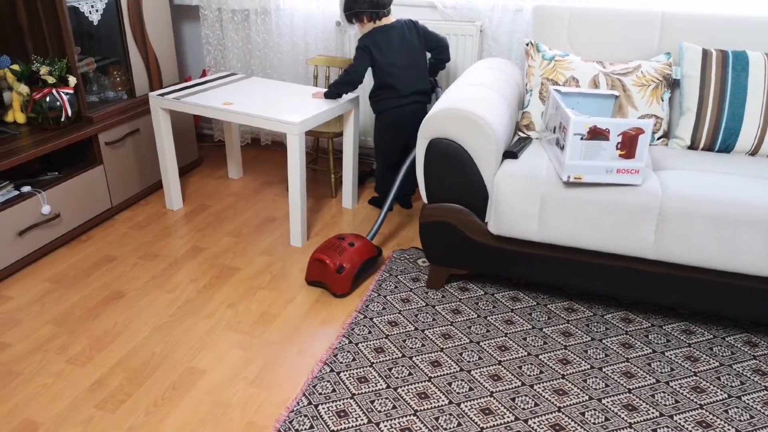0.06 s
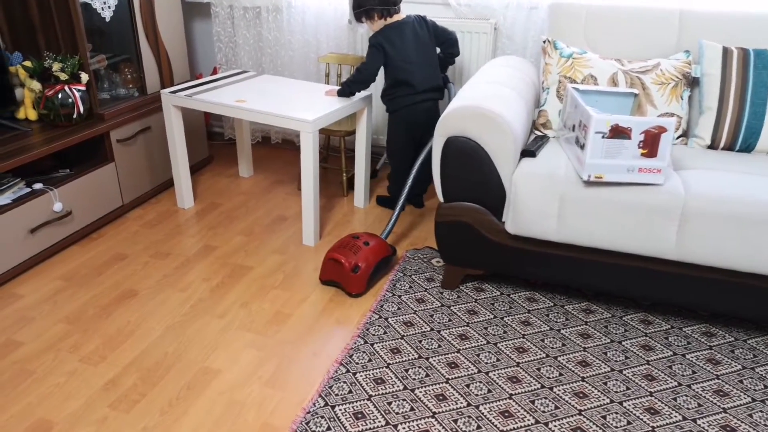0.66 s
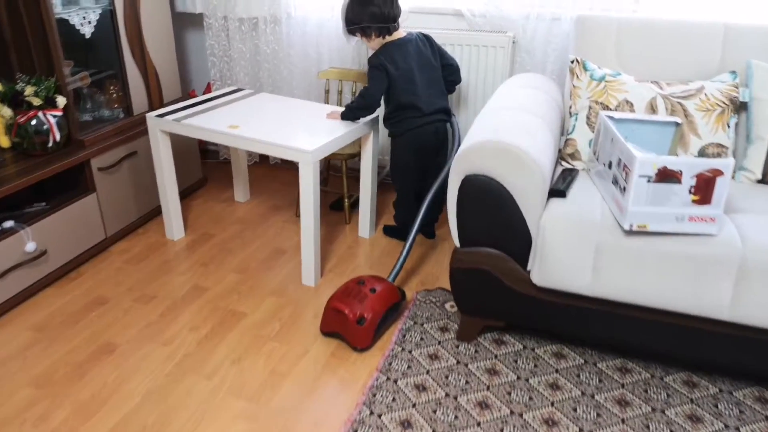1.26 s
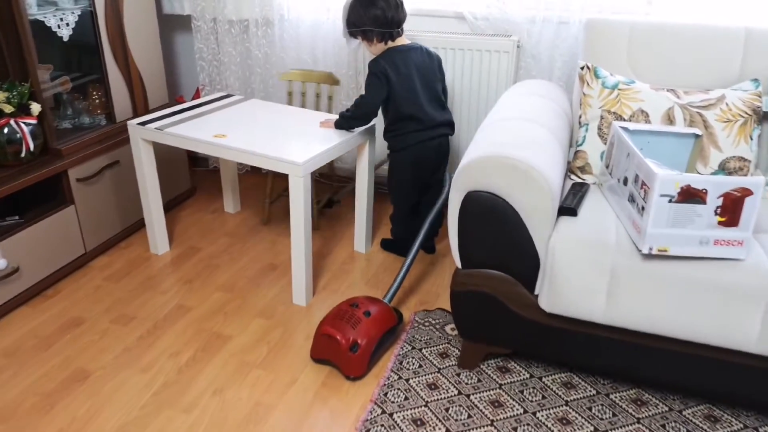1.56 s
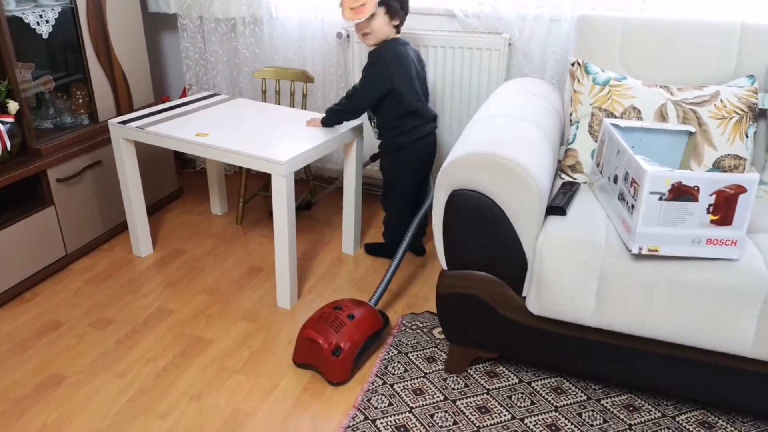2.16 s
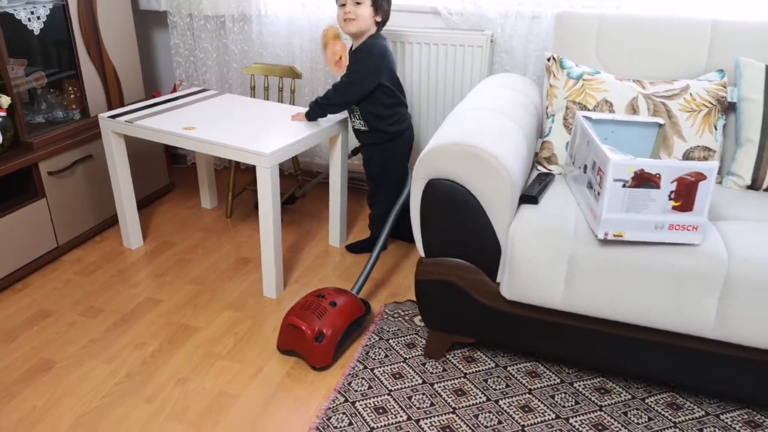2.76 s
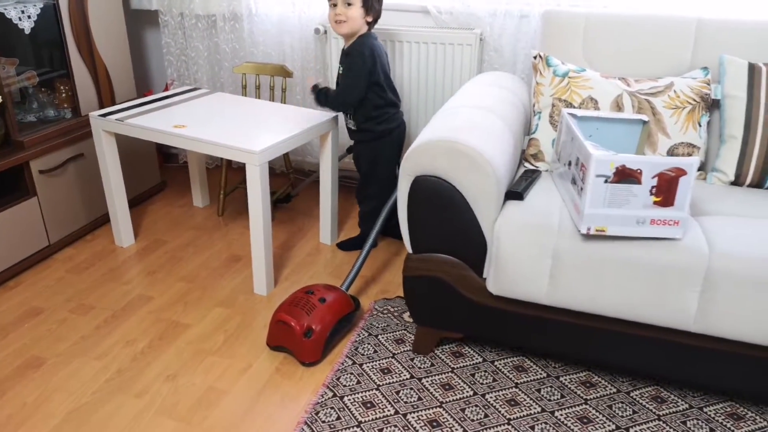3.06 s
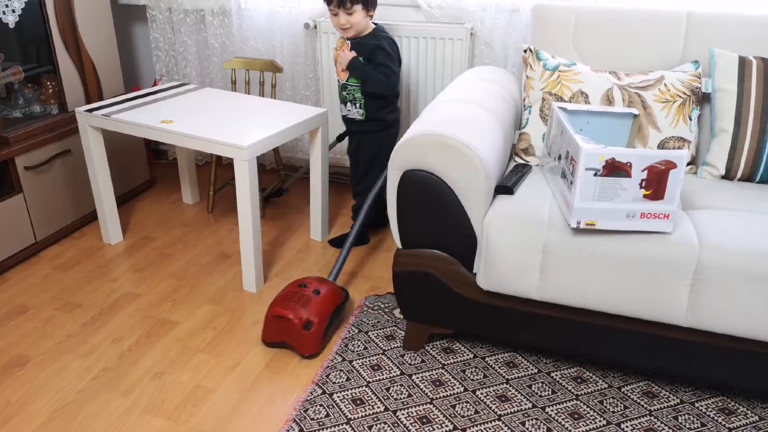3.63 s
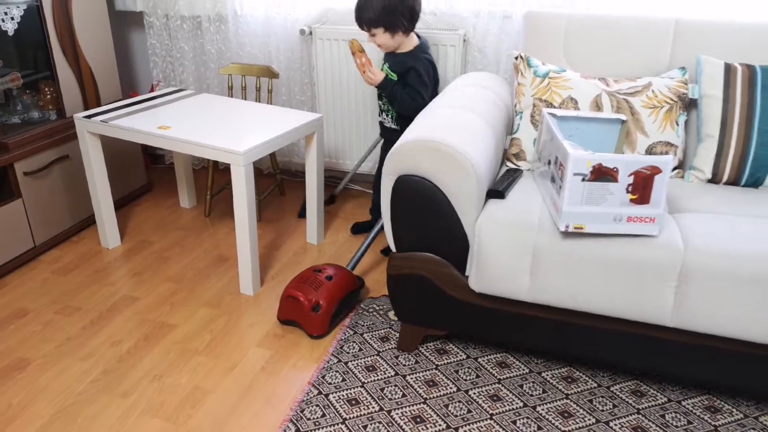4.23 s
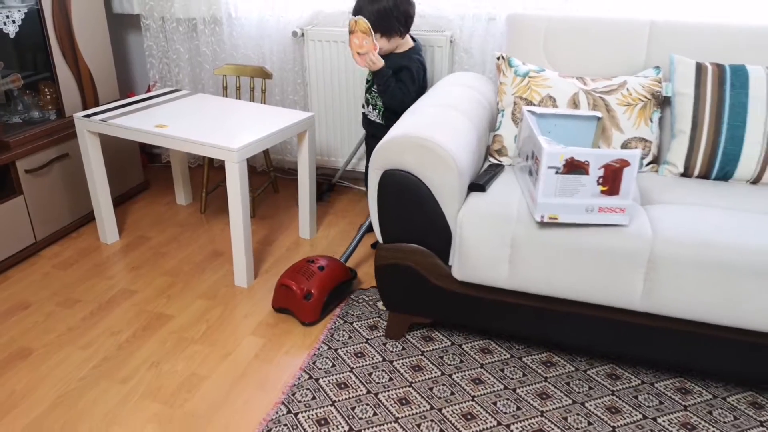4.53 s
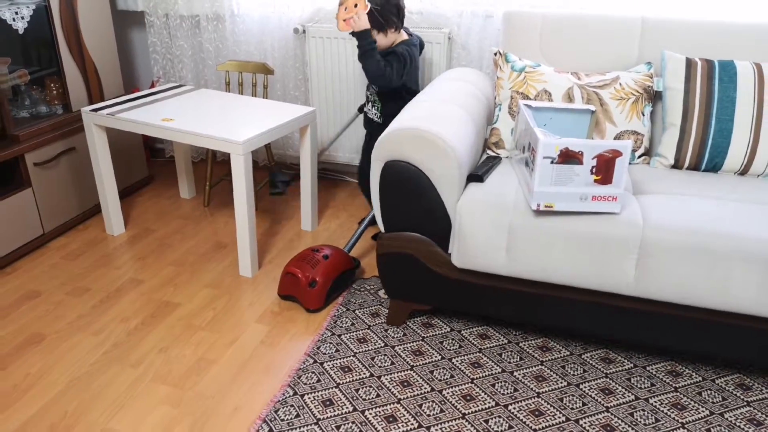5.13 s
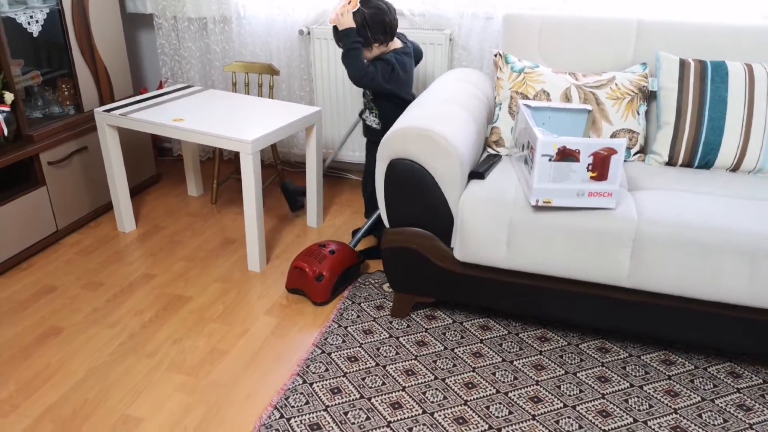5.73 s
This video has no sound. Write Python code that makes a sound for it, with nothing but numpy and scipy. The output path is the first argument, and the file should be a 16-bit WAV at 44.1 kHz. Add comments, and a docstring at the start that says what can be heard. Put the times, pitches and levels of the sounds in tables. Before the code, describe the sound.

Sharp hollow plastic clacks, a short rattling roll and light scrapes as a child drags a toy vacuum cleaner around a room.

```python
"""In a living room, a child drags a plastic toy vacuum cleaner over a laminate floor.
Hard wheels make its hollow body rumble and rattle, and its nozzle scrapes in short strokes.
Nozzle and wand (the long tube) clack against furniture, which sets their thin walls ringing.
Brushing sleeves, soft footfalls, tiny ticks, a faint hum and a thin electrical whine lie underneath.
The room answers the toy with a short echo."""
import sys
import numpy as np
from scipy import signal
from scipy.fft import rfft, irfft, next_fast_len
from scipy.io import wavfile
from scipy.ndimage import map_coordinates

SR = 44100
rng = np.random.default_rng(int(sys.argv[2]) if len(sys.argv) > 2 else 0)


def transcribe(signal):
    """Save signal, clipped to [-1, 1], as a 16-bit WAV file at the path in sys.argv[1]."""
    frames = np.atleast_2d(signal).T
    limited = np.clip(frames, -1, 1)
    pcm = np.round(limited * 32767).astype(np.int16)
    wavfile.write(sys.argv[1], SR, pcm)


N = 264159  # samples: about 6 seconds


def amp(db):
    """Turns decibels into a number to multiply by."""
    return 10 ** (np.asarray(db) / 20)


def unit(x):
    """Scales a sound to an average strength (rms) of 1."""
    return x / np.sqrt(np.mean(x ** 2) + 1e-20)


def peak_at(x, db):
    """Scales a sound so that its highest peak has this level."""
    return amp(db) * x / np.abs(x).max()


def along(points, hz):
    """Reads between (frequency, value) points, on a scale of octaves."""
    freqs, values = np.transpose(points)
    return np.interp(np.log(hz + 1), np.log(freqs + 1), values)


def filtered(x, response):
    """Makes each frequency stronger or weaker, as response(hz) says."""
    n = x.shape[-1]
    size = next_fast_len(n + SR // 4)
    return irfft(rfft(x, size) * response(np.fft.rfftfreq(size, 1 / SR)), size)[..., :n]


def colour(points):
    """A filter shaped by (frequency, level) points; it never sounds before its input."""
    def response(hz):
        cepstrum = irfft(np.log(amp(along(points, hz))))
        return np.exp(rfft(2 * cepstrum[:len(hz) - 1], len(cepstrum)) - cepstrum[0])
    return response


def resonant(modes):
    """A filter that rings at each (pitch, width, level); narrow ones ring longer."""
    return lambda hz: sum((-1) ** k * amp(db) * 1j * hz * width / (pitch**2 - hz**2 + 1j * hz * width)
                          for k, (pitch, width, db) in enumerate(modes))


def wobble(rate):
    """A smooth random curve through `rate` points a second."""
    points = rng.standard_normal(int(N * rate / SR) + 4)
    return map_coordinates(points, [np.arange(N) * rate / SR])


def grains(size, rate, spread_db):
    """Tiny random hits of uneven strength, about `rate` a second."""
    chance, strength, sign = rng.random(size), rng.standard_normal(size), rng.choice([-1, 1], size)
    return (chance < rate / SR) * sign * amp(spread_db * np.clip(strength, -2, 2))


def gesture(start, length, attack, sag_db_per_s, t60):
    """One movement's loudness: it rises, sags, then fades by 60 dB or more in t60 seconds."""
    t = np.arange(N) / SR - start
    rise = np.sin(np.pi / 2 * np.clip(t / attack, 0, 1)) ** 2
    return rise * amp(-sag_db_per_s * np.maximum(t - attack, 0) - 60 * np.maximum(t - length, 0) / t60)


def add(track, s, sound):
    """Mixes a sound into the track at s seconds."""
    start = max(round(s * SR), 0)
    track[:, start:start + sound.shape[-1]] += sound[..., :N - start]


# how alike left and right sound: (frequency [Hz], likeness [0 to 1])
LIKENESS = [(60, 0.86), (250, 0.95), (500, 0.77), (850, 0.55), (1400, 0.14), (3000, 0.033)]
def diffuse(size):
    """Noise from all sides: alike at both microphones in the bass only."""
    def shares(hz):
        angle = np.arccos(np.clip(along(LIKENESS, hz), -1, 1)) / 2
        return np.array([np.cos(angle), np.sin(angle)])
    mid, side = filtered(rng.standard_normal((2, size)), shares)
    return np.array([mid + side, mid - side])


# how long the room echoes: (frequency [Hz], time to fade by 60 dB [s])
ECHO_TIMES = [(100, 0.37), (400, 0.46), (1000, 0.35), (2800, 0.29), (7000, 0.24), (15000, 0.21)]
def room(direct_db, early_db, early_t60=0.036):
    """One path to the microphones: direct sound, echoes off nearby furniture, then the tail."""
    hz, t, noise = signal.stft(diffuse(SR // 2), SR, nperseg=256)
    decay = amp(-60 * t / along(ECHO_TIMES, hz)[:, None]) + amp(early_db - 60 * t / early_t60)
    path = signal.istft(noise * decay, SR, nperseg=256)[1]
    path /= np.linalg.norm(path[0])
    # the toy lies a little to the right, so the left side hears it 4 samples later
    path[[0, 1], [4, 0]] += amp(direct_db)
    return path / np.linalg.norm(path[0])


def heard(x, path):
    """Sends one sound along a room path to both microphones."""
    return signal.fftconvolve(x[None], path, axes=1)[:, :len(x)]


def travelling(x, direct_db, early_db, step_s=0.12):
    """A moving source takes a new path through the room at every step."""
    hop = round(step_s * SR)
    out, fade = np.zeros((2, N)), signal.get_window("hann", 2 * hop)
    padded = np.pad(x, (hop, 2 * hop))
    for start in range(0, N, hop):
        piece = padded[start:start + 2 * hop] * fade
        if piece.any():
            sound = signal.fftconvolve(piece[None], room(direct_db, early_db), axes=1)
            add(out, (start - hop) / SR, sound[:, max(hop - start, 0):])
    return out


# the tone of the room's air: (frequency [Hz], relative level [dB])
AIR_TONE = [(25, -3), (60, 1), (100, -8.5), (140, -2.5), (220, -13.5), (500, -17.5), (1200, -23.5),
            (3500, -23.5), (8000, -26), (12000, -16.5), (14500, -24), (16000, -54)]
# the notes of the hum: (pitch [Hz], level [dB])
HUM_NOTES = [(183.0, -72), (366.1, -72)]
# how the whine swells and sinks: (time [s], level [dB])
WHINE_SWELL = [(0, -83), (1.7, -76), (2.6, -75), (3.05, -67), (3.35, -76), (4.55, -63), (4.85, -71),
               (5.2, -62), (6, -64)]
def background():
    """Still room air, an appliance hum and a thin electrical whine; the last two waver in level."""
    t, whine_hz = np.arange(N) / SR, 14999
    air = amp(-59.5) * unit(filtered(diffuse(N), colour(AIR_TONE)))
    hum = sum(amp(db + 1.1 * wobble(9.3)) * np.sqrt(2) * np.sin(2 * np.pi * hz * t)
              for hz, db in HUM_NOTES)
    whine_db = np.interp(t, *np.transpose(WHINE_SWELL)) + 2.1 * np.array([wobble(5), wobble(3)])
    return air + hum + amp(whine_db) * np.sin(2 * np.pi * whine_hz * t)


# sleeve brushes: (start [s], length [s], relative level [dB])
SLEEVE_BRUSHES = [(1.02, .27, -57), (1.812, 0.19, -50.5), (2.392, 0.47, -60), (4.832, 0.37, -55),
                  (5.632, 0.12, -56.5), (5.86, .13, -54.5)]
def rustling():
    """The child's clothes brush softly as the arm gently starts and stops."""
    tone = colour([(1500, -10.5), (7000, -13), (11500, 2), (13000, 1.5), (16000, -23.5)])
    cloth = unit(filtered(diffuse(N), tone))
    arm = sum(amp(db) * gesture(s, length, attack=0.085, sag_db_per_s=0, t60=0.24)
              for s, length, db in SLEEVE_BRUSHES)
    return arm * amp(0.5 + wobble(23)) * cloth


# soft steps: (time [s], relative pat level [dB], relative heel level [dB])
FOOTSTEPS = [(3.165, -58, -80), (4.263, -44, -82), (4.764, -56.5, -80), (5.538, -49, -52.5),
             (5.584, -48.5, -51.5)]
def footfalls():
    """Socked feet give a dull pat and a low push on the boards."""
    out, t = np.zeros((2, N)), np.arange(SR // 2) / SR
    for s, pat_db, heel_db in FOOTSTEPS:
        burst = rng.standard_normal(len(t)) * amp(-60 * t / 0.014)
        touch = heard(burst, room(direct_db=-32, early_db=3.5))
        pat = filtered(touch, colour([(100, -25), (280, 8), (800, 5.5), (1500, -8), (5000, -22)]))
        heel = filtered(touch, resonant([(70, 7.5, 9.5), (144, 31, 1.3)]))
        add(out, s, peak_at(pat, pat_db + 6.5) + peak_at(heel, heel_db + 5.5))
    return out


# dry ticks: (time [s], relative level [dB], pitch [Hz], width [Hz])
DRY_TICKS = [(1.0937, -27, 3785, 6130), (4.8253, -26.5, 4180, 962)]
def ticks():
    """Tiny clicks close by, with little echo."""
    out, t = np.zeros((2, N)), np.arange(SR // 4) / SR
    for s, db, hz, width in DRY_TICKS:
        burst = rng.standard_normal(len(t)) * amp(-60 * t / 0.0049)
        touch = heard(burst, room(direct_db=14.5, early_db=7))
        ring = filtered(touch, resonant([(hz, width, 0)]))
        tick = filtered(ring, resonant([(hz, 2.3 * width, 0)]))
        add(out, s, peak_at(tick, db - 4))
    return out


# nozzle strokes: (start [s], length [s], relative level [dB], extra rumble [dB], extra hiss [dB])
NOZZLE_STROKES = [(-0.02, 0.039, -48, 1, 5), (0.411, 0.039, -46, -6, -9), (0.755, .085, -33, -17, -3),
                  (0.842, 0.024, -31, -7, -8), (2.233, 0.054, -39, -7.5, -2.5), (2.474, .05, -61, -19, 10),
                  (2.703, 0.082, -46.5, -4, -4.5), (2.908, 0.075, -57, 4.5, -22.5),
                  (3.203, 0.11, -57.5, -11, -3), (3.305, 0.098, -41.5, -8.5, -6.5),
                  (3.387, 0.11, -52, -2, -6), (3.469, 0.227, -35, -7, -6.5),
                  (3.934, 0.15, -33, -20.5, -7.5), (4.11, 0.1, -53, -29, -10),
                  (4.258, 0.09, -50.5, -25, -7)]
# the notes of the nozzle's head: (pitch [Hz], width [Hz], relative level [dB])
NOZZLE_NOTES = [(590, 51, -25), (1000, 110, -4.5), (1410, 180, 2), (1546, 75, 2), (1710, 170, 0),
                (2067, 85, 5.5), (2440, 200, 3), (3210, 770, -7.5)]
# the scraping edge: (frequency [Hz], relative level [dB])
SCRAPE_TONE = [(450, -43.5), (850, -12.5), (1400, 9), (2400, -24), (3300, -3.5), (4600, -2), (7500, -11),
               (12000, -45.5)]
# the toy's low rumble: (frequency [Hz], relative level [dB])
RUMBLE_TONE = [(45, -18.5), (70, -11.5), (110, -17.5), (160, -11), (200, -5.5), (262, 2.5), (390, -7),
               (550, -2), (740, -2.5), (1050, -4.5), (1600, -11.5), (3000, -58.5)]
# the bright treble of cracks, grit and hiss, as the microphones colour it:
# (frequency [Hz], relative level [dB])
TREBLE_TONE = [(4000, -47), (7200, -7.5), (9500, -7.5), (10800, 2.5), (12500, -0.5), (14000, -12.5),
               (15500, -21.5), (16500, -33)]
def scraping():
    """The nozzle sticks and slips in dense fine grains that ring its hollow head."""
    scrape, rumble, hiss = np.zeros((3, N))
    for s, length, db, rumble_db, hiss_db in NOZZLE_STROKES:
        # the nozzle gathers speed, slows and slides to rest
        stroke = amp(db) * gesture(s, length, attack=0.48 * length, sag_db_per_s=21, t60=0.14)
        scrape += stroke
        rumble += amp(rumble_db) * stroke
        hiss += amp(hiss_db) * stroke
    slips = grains(N, rate=4000, spread_db=7.5) * amp(1.2 * wobble(50))
    low = amp(3.1) * rumble * unit(filtered(slips, colour(RUMBLE_TONE)))
    head = amp(1.5) * unit(filtered(slips, resonant(NOZZLE_NOTES)))
    edge = amp(-3) * unit(filtered(grains(N, rate=3000, spread_db=5), colour(SCRAPE_TONE)))
    high = hiss * unit(filtered(slips, colour(TREBLE_TONE)))
    return travelling(low + scrape * (head + edge) + high, direct_db=-11, early_db=12)


def blows(rows, notes, wall_tone, thump_gain_db, clack_gain_db, crack_gain_db,
          ring_db, ring_width_share, spread_s, snap_db, direct_db, early_db):
    """Each blow snaps, makes loose joints chatter and rings the hollow part and its thin walls."""
    out, t = np.zeros((2, N)), np.arange(SR // 2) / SR
    push = np.exp(-t / 0.00027)  # the bulk of the part feels one short push
    swell = 1 - np.exp(-t / spread_s)  # the blow takes a moment to spread through the walls
    for s, db, thump_db, crack_db, ring_hz, chatter_s in rows:
        chatter = grains(len(t), rate=6000, spread_db=4) * amp(-60 * t / max(chatter_s, 0.004))
        snap = amp(snap_db) * rng.standard_normal(len(t)) * amp(-60 * t / 0.0034)
        path = room(direct_db, early_db)
        walls = filtered(heard(chatter * swell, path), colour(wall_tone))
        clack = walls + filtered(walls, resonant([(ring_hz, ring_width_share * ring_hz, ring_db)]))
        thump = filtered(heard(push, room(direct_db=-33, early_db=-21)), resonant(notes))
        crack = filtered(heard(chatter + snap, path), colour(TREBLE_TONE))
        for part, part_db in [(clack, clack_gain_db), (thump, thump_db + thump_gain_db),
                              (crack, crack_db + crack_gain_db)]:
            strength = np.sqrt(np.mean(part[:, :SR // 25] ** 2))  # over the first 40 ms
            add(out, s, amp(db + part_db) * part / strength)
    return out


# the notes of the hollow wand: (pitch [Hz], width [Hz], relative level [dB])
WAND_NOTES = [(151, 350, -13), (403.3, 20, 9), (414, 86, -0.5), (524, 87, -5), (650, 33, -1)]
# the tone of its walls: (frequency [Hz], relative level [dB])
WAND_TONE = [(450, -50), (750, 1), (1200, -3), (1900, 3), (2700, 0.5), (4600, 2.5), (6200, 3),
             (7300, -18.5), (9000, -15), (13000, -31)]
# taps: (time [s], relative level [dB], extra thump [dB], extra crack [dB], ring [Hz], chatter [s])
WAND_TAPS = [(5.1159, -20, -23, 0.93, 4760, 0.02), (5.3813, -21.5, -27, 0, 3130, 0.031),
             (5.7763, -27.5, -18.5, 0.012, 4100, 0.036)]
def tapping():
    """The lifted wand taps furniture and rings like a tube."""
    return blows(WAND_TAPS, WAND_NOTES, WAND_TONE,
                 thump_gain_db=2.5, clack_gain_db=-8.5, crack_gain_db=-5.5,
                 ring_db=4.5, ring_width_share=0.4, spread_s=0.018, snap_db=-4,
                 direct_db=-16, early_db=-38.5)


# the notes of the hollow body: (pitch [Hz], width [Hz], relative level [dB])
BODY_NOTES = [(198, 42, -7.5), (259.2, 47, 2.5), (348, 210, -7.5), (624, 71, 0.5), (736.5, 15, 4.5),
              (855, 24, -6.5)]
# the tone of its shell: (frequency [Hz], relative level [dB])
SHELL_TONE = [(450, -35), (750, -6.5), (1100, -4.5), (1800, -4), (2900, -7), (4600, -4.5), (6200, -4.5),
              (7200, -11.5), (9000, -4), (13000, -38.5)]
# knocks: (time [s], relative level [dB], extra thump [dB], extra crack [dB], ring [Hz], chatter [s])
PLASTIC_KNOCKS = [(0.0437, -18, -20.5, -11, 1000, 0.012), (0.2437, -10, -18, -5, 2810, 0.026),
                  (0.2887, -16.5, -12, -2, 3860, 0.08), (0.6969, -5, -19, -8, 3740, 0.0084),
                  (0.8477, -14.5, -21.5, -4, 4240, 0.025), (2.089, -23, -12.5, -12.5, 4000, 0.045),
                  (2.2485, -24, -17.5, -15.5, 2960, 0.1), (3.698, -13.5, -15, -10, 1844, 0.015),
                  (3.895, -14.5, -17.5, -10, 2120, 0.083)]
def knocking():
    """Plastic parts knock: the thin shell clacks sharply over a soft thump of the body."""
    return blows(PLASTIC_KNOCKS, BODY_NOTES, SHELL_TONE,
                 thump_gain_db=-13.5, clack_gain_db=-13.5, crack_gain_db=-9,
                 ring_db=11, ring_width_share=0.5, spread_s=0.00098, snap_db=-3,
                 direct_db=-19.5, early_db=-11)


# wheel drops: (time [s], relative level [dB])
WHEEL_DROPS = [(1.266, -34.5), (1.308, -31), (1.502, -19.5), (1.526, -16.5), (1.611, -19), (1.638, -24)]
def bumps():
    """A wheel drops over a joint in the floor and thuds the hollow body."""
    out, push = np.zeros((2, N)), np.exp(-np.arange(SR // 2) / SR / 0.0051)
    for s, db in WHEEL_DROPS:
        thud = filtered(heard(push, room(direct_db=11, early_db=1.5)), resonant(BODY_NOTES))
        add(out, s, peak_at(thud, db - 1.5))
    return out


# the toy is pulled along, 0 dB being full speed: (time [s], wheel speed [dB])
PULL_SPEED = [(1.12, -40), (1.25, -23), (1.335, -11.5), (1.42, -1), (1.529, -0.5), (1.585, -8),
              (1.64, -12.5), (1.70, -54), (1.80, -50)]
# it creeps on a little afterwards: (start [s], length [s], wheel speed [dB])
CREEP_SPEED = [(1.868, 0.15, -33.5)]
# jolts that shake the shell: (time [s], relative level [dB])
SHELL_JOLTS = [(1.325, -37.5), (1.369, -31.5), (1.611, -32.5)]
# the rattling shell: (frequency [Hz], relative level [dB])
RATTLE_TONE = [(600, -39), (1200, -5), (1600, -5), (2600, -5), (3800, -6.5), (5800, -8.5), (8000, -22),
               (12000, -50.5)]
def rolling():
    """Hard wheels judder over the boards: the body booms and grit rattles the shell, more so at speed."""
    speed = amp(np.interp(np.arange(N) / SR, *np.transpose(PULL_SPEED), left=-np.inf, right=-np.inf))
    speed += sum(amp(db) * gesture(s, length, attack=0.05, sag_db_per_s=7, t60=0.4)
                 for s, length, db in CREEP_SPEED)
    shake = sum(amp(db) * gesture(s, 0, attack=0.0028, sag_db_per_s=6, t60=0.18)
                for s, db in SHELL_JOLTS)
    # powers above 1: rattle and grit grow faster with speed than the rumble does
    rattle_gain = np.hypot(amp(-23.5) * speed ** 1.29, shake)
    grit_gain = np.hypot(amp(-29.5) * speed ** 1.3, amp(-4) * shake)
    judder_hz = 35 * amp(2.7 * wobble(30))
    judder_count = np.floor(np.cumsum(judder_hz) / SR)
    judder = np.diff(judder_count, prepend=0) * amp(2 * wobble(39.68))
    boom = amp(-11.5) * unit(filtered(judder, resonant(BODY_NOTES)))
    tread = amp(1.2) * unit(filtered(grains(N, rate=1200, spread_db=4), colour(RUMBLE_TONE)))
    rumble = amp(-24) * speed * (boom + tread)
    dust = grains(N, rate=1200, spread_db=4) * amp(2.2 * wobble(60.1))
    rattle = amp(2.5) * rattle_gain * unit(filtered(dust, colour(RATTLE_TONE)))
    grit = amp(0.9) * grit_gain * unit(filtered(dust, colour(TREBLE_TONE)))
    return travelling(rumble + rattle + grit, direct_db=-6, early_db=8.5, step_s=0.06)


def scene():
    """All the sounds of the living room together."""
    toy = knocking() + tapping() + rolling() + bumps() + scraping()
    return toy + rustling() + footfalls() + ticks() + background()


# how much louder the right microphone is: (frequency [Hz], right minus left [dB])
MIC_BALANCE = [(60, 2.5), (200, 1.5), (2400, 1.3), (4400, -1), (8000, 2), (10500, 3), (12500, -5),
               (15000, -16.5)]
def record(dry):
    """The two microphones differ in tone, and neither picks up the very highest sounds."""
    top_hz = 16200
    return filtered(dry, lambda hz: amp(np.outer([-0.5, 0.5], along(MIC_BALANCE, hz))) * (hz < top_hz))


dry = scene()
out = record(dry)
transcribe(out)
```